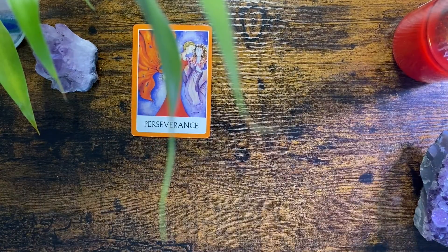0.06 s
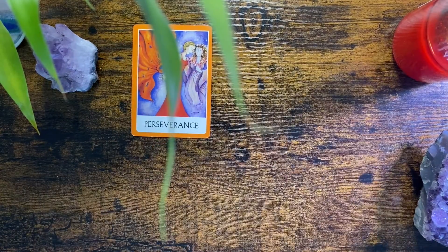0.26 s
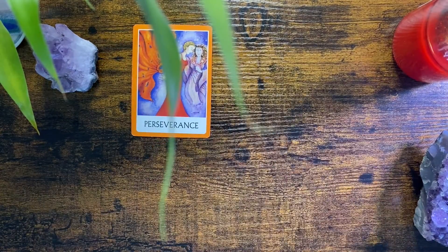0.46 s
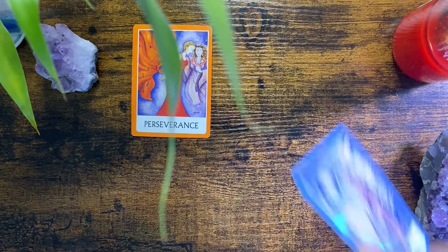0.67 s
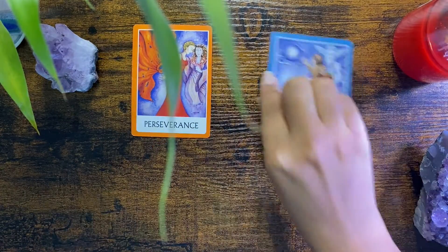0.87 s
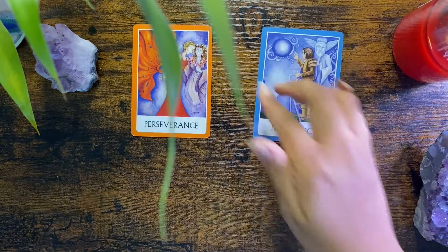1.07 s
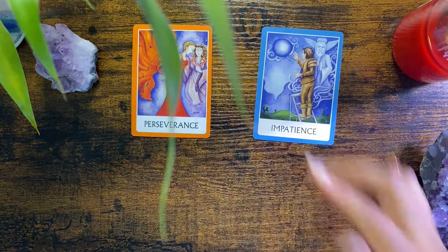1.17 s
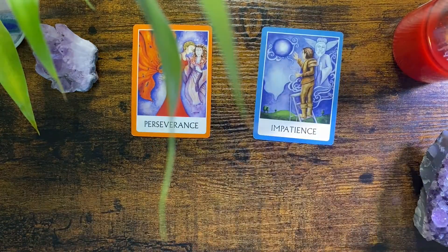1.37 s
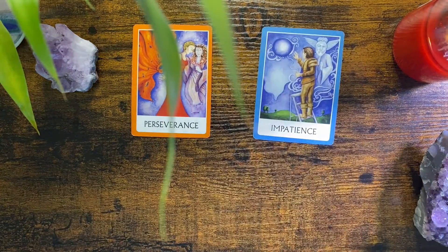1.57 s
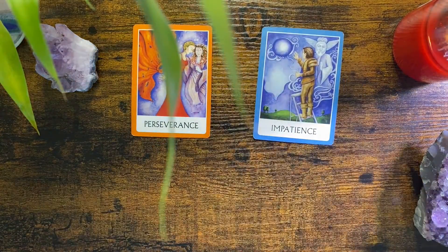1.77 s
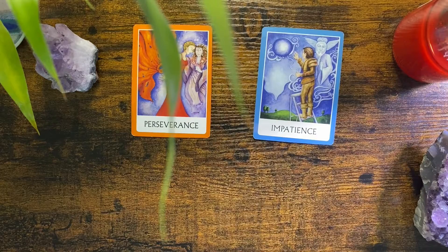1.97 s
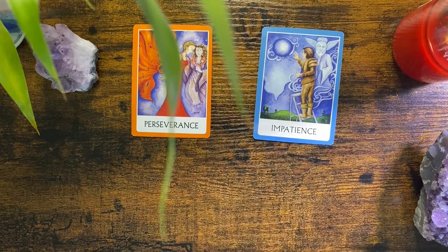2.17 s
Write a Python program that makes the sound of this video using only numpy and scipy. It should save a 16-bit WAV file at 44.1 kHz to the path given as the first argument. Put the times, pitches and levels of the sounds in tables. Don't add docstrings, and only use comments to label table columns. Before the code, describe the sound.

Stiff cards handled on a wooden table: a papery rub, two sharp snaps with air puffs, a ringing knock as one lands, a short pause, then softer knocks and drags; close phone microphone in a quiet room.

```python
import sys
import numpy as np
from scipy import signal
from scipy.fft import rfft, irfft
from scipy.io import wavfile
from scipy.ndimage import uniform_filter1d

SR = 44100
rng = np.random.default_rng(int(sys.argv[2]) if len(sys.argv) > 2 else 0)


def to_wav(sig):
    pcm = np.clip(np.atleast_2d(sig), -1, 1) * 32767
    pcm = np.round(pcm).astype(np.int16)
    wavfile.write(sys.argv[1], SR, pcm.T)


def how_loud(loudness_db):
    steps = np.asarray(loudness_db, float) / 20
    return 10 ** steps


N = 99225

# f/Hz, level/dB (rms)
HUM_LINES = [
    (204.6, -53),
    (306, -61),
]
# f/Hz, level/dB (per Hz)
AIR_COLOUR = [(30, -12.5), (100, 2), (250, 16.5), (500, 10.5), (800, -6.5), (2600, -2), (5000, -19.5),
              (16000, -35)]
# start t/s, end t/s, first level/dB, last level/dB
SLEEVE_BRUSHES = [
    (0, 0.203, -50.5, -65),
    (1.295, 1.406, -50, -44.5),
]
# start t/s, end t/s, first level/dB, last level/dB, treble level/dB
CARD_RUBS = [(0, 0.213, -45, -48.5, 2.5), (0.209, 0.254, -48.5, -36, 3), (0.276, 0.387, -52, -42, 2.5),
             (0.372, 0.425, -36.5, -33.5, 9), (0.424, 0.463, -37, -33.5, 8),
             (0.506, 0.639, -51.5, -43.5, 5), (0.641, 0.692, -42, -43.5, -2),
             (0.723, 0.827, -52, -60.5, 3.5), (0.824, 0.877, -26.5, -43, -4), (0.873, 0.897, -44, -43, -2),
             (0.893, 1.022, -41.5, -50, 9.5), (1.021, 1.1, -32.5, -52.5, 14), (1.024, 1.06, -48, -57, -3),
             (1.104, 1.214, -39, -64, 0), (1.347, 1.419, -78, -63.5, 11.5), (1.43, 1.546, -39.5, -61.5, 6),
             (1.542, 1.616, -44.5, -38.5, -0.5), (1.613, 1.649, -29, -40.5, 0),
             (1.663, 1.73, -54.5, -33.5, -0.5), (1.721, 1.799, -40.5, -29.5, 5.5),
             (1.827, 1.919, -43, -42.5, 6), (1.932, 1.978, -35.5, -34, -1), (1.998, 2.084, -51.5, -62, 3.5),
             (2.08, 2.116, -49.5, -46, -1.5), (2.15, 2.215, -49, -53, -2.5), (2.225, 2.26, -54, -57, 0.5)]
# f/Hz, level/dB (per Hz)
PAPER_COLOUR = [(300, -3.5), (600, -2), (1100, -2), (2600, -2.5), (3800, -9.5), (5500, -20), (9000, -36.5)]
# f/Hz, level/dB (per Hz)
HISS_COLOUR = [(3000, -30), (5500, -11.5), (6900, -12.5), (9500, -13.5), (12000, -24.5), (15500, -27)]
# f/Hz, level/dB, time to fall 60 dB t/s
TABLE_MODES = [(62, 0, .12), (88, 0, .1), (110, -2, .09), (147, -2, .09), (208, 0, .14), (252, -4, .08),
               (312, 0, .09), (360, -1, .08), (441, 0, .085), (520, -2, .05), (620, -3, .04),
               (850, -1, .04), (1050, -3, .03), (1230, -1, .045)]
# start t/s, end t/s, first level/dB, last level/dB, favoured f/Hz
HAND_DRAGS = [(0.328, 0.486, -44.5, -33.5, 117), (0.443, 0.647, -33, -62, 101),
              (0.805, 0.877, -38.5, -37, 120), (0, 0.305, -67, -34, 94), (0.996, 1.236, -28.5, -59.5, 102),
              (1.417, 1.5, -30, -58, 150), (1.55, 1.667, -27, -24.5, 151), (1.685, 1.724, -28, -31.5, 100),
              (1.744, 1.82, -22.5, -32.5, 237), (1.844, 1.905, -49, -34, 200),
              (1.92, 2.018, -28, -31.5, 204), (2.026, 2.111, -44, -34.5, 198), (2.156, 2.26, -33, -44, 172)]
# t/s, level/dB, f/Hz favoured by the spot, share of the free ring time
TABLE_KNOCKS = [(0.261, -25.5, 88, 0.34), (0.331, -33, 89, 0.39), (0.386, -36, 81, 0.26),
                (.454, -16, 463, 0.29), (0.627, -22.5, 832, 0.39), (0.6282, -20.5, 1190, 0.28),
                (0.624, -33, 140, 0.67), (0.734, -28.5, 564, 0.27), (.825, -21.5, 865, 0.4),
                (0.827, -30.5, 87, 0.51), (0.838, -24, 720, 0.22), (0.874, -23, 364, 0.38),
                (0.876, -27, 600, 0.18), (1.0229, -7.5, 436, 1.1), (1.033, -17.5, 445.3, 1.39),
                (1.025, -17, 1225, 0.74), (1.017, -19.5, 94, 0.4), (1.021, -9.5, 1110, 0.2),
                (1.030, -17, 203.5, 1.77), (1.422, -25.5, 145, 0.36), (1.440, -29.5, 426, 0.56),
                (1.549, -12, 295, 1.1), (1.563, -13.5, 201, 1), (1.582, -18, 75, 0.44),
                (1.607, -19.5, 281, 0.57), (1.634, -15, 210, 0.7), (1.642, -13.5, 330, 0.28),
                (1.650, -15, 158, 0.8), (1.671, -24, 302, 0.47), (1.688, -23.5, 79.6, 0.42),
                (1.727, -10.5, 296, 1.3), (1.749, -26, 69, .5), (1.766, -25, 330, .5),
                (1.78, -21.5, 484, 0.7), (1.786, -18, 250, 0.8), (1.796, -22.5, 127, 1.2),
                (1.871, -29, 306, 1.3), (1.906, -23, 213, 1), (1.923, -24, 340, 0.73),
                (1.949, -23, 264, 0.77), (1.972, -24.5, 212, 0.4), (1.988, -27, 112, 0.68),
                (1.998, -23.5, 318, 0.78), (2.088, -29, 303, .6), (2.169, -31, 307, 0.61),
                (2.182, -33, 92, 0.59), (2.239, -35.5, 200, .6)]
# t/s of the extreme, peak level/dB, width t/ms, push +1 or pull -1
AIR_PUFFS = [
    (.2448, -12, 2.5, 1),
    (.2516, 0, 1.05, -1),
    (.2575, -11, 4, 1),
    (.4655, -14, 3, 1),
    (.4698, -5, 1.1, -1),
    (.4735, -12, 2, 1),
    (.4812, -12, 2.2, -1),
    (.4848, -11, 1.0, 1),
]
# t/s, peak level/dB, treble level/dB,
# ring-down t/ms, f/Hz of the flexed card (for the scrape, its pitch)
EDGE_CRACKS = [(0.044, -29, -24, 2.1, 1950), (0.228, -24, -25, 2.6, 2200), (0.233, -14, -34, 1.8, 1274),
               (0.2494, -9, -15.5, 1.2, 1850), (0.249, -14, -14, 2.4, 3300),
               (0.2337, -17.5, -32, 1.7, 3360), (.365, -26, 3, 1.2, 4200), (0.382, -22.5, -17, 1.8, 1390),
               (.444, -18, -18, 5.6, 2610), (.4535, -9, -30, 1.05, 2340), (0.458, -15, -19, 3.3, 1100),
               (0.4657, -11.5, -9, 1.2, 2520), (0.4835, -7.5, -8.5, 1.46, 1930),
               (0.4841, -14, -12, 0.8, 4970), (0.487, -11, -30, 1.72, 1090), (0.627, -12, -6.5, 0.37, 2600),
               (.824, -16.5, -8, 2.7, 3320), (0.832, -32, -14, 1.5, 1820), (.843, -29, -6, 2.4, 3500),
               (.874, -25.5, -20, 2.9, 910), (0.957, -30, -25.5, 25, 3030), (1.004, -21.5, -9, 7.8, 3100),
               (1.020, -5.5, 3.5, 3.4, 3200), (1.032, -37, 12, 1.3, 3540), (1.107, -26, -20, 2.7, 2500),
               (1.4259, -31.5, -18, 1.8, 2730), (1.441, -31.5, -17, 4, 2170),
               (1.550, -31.5, -32, 4.5, 1050), (1.614, -23.5, -11, 5.5, 1490),
               (1.672, -22.5, -8, 4.5, 1470), (1.698, -22, -9, 6.1, 1620), (1.730, -13.5, -6, 4.6, 1340),
               (1.73, -5.5, -21, 1.8, 2200), (2.087, -47.5, 7.5, 3, 2500), (1.948, -27, -3.5, 14, 2550),
               (2.233, -48, -19, 2.1, 2340)]

LOWEST_HZ = 50


def unit_rms(x):
    return x / np.sqrt(np.mean(x ** 2))


def unit_peak(x):
    return x / np.max(np.abs(x))


def colour(x, points):
    hz = np.maximum(np.fft.rfftfreq(len(x), 1 / SR), 1)
    point_hz, point_db = np.array(points, float).T
    gain_db = np.interp(np.log(hz), np.log(point_hz), point_db)
    return irfft(rfft(x) * how_loud(gain_db), len(x))


def band(x, hz, width_hz):
    return signal.lfilter(*signal.iirpeak(hz, hz / width_hz, fs=SR), x)


def butter(x, order, hz, kind):
    return signal.sosfilt(signal.butter(order, hz, kind, fs=SR, output="sos"), x)


def add(out, start_s, x):
    i = max(int(start_s * SR), 0)
    out[i:i + len(x)] += x[:N - i]


def walk(rate):
    hold = int(SR / rate)
    steps = np.repeat(rng.standard_normal(N // hold + 1), hold)
    return 0.89 * uniform_filter1d(uniform_filter1d(steps, hold), hold)[:N]


def stroke(start_s, end_s, first_db, last_db):
    attack_s, release_s = 0.011, 0.014
    t = np.arange(N) / SR
    hold = how_loud(np.interp(t, [start_s, end_s], [first_db, last_db]))
    attack = np.clip((t - start_s) / attack_s + (start_s <= 0), 0, 1)
    return hold * attack * np.exp(-np.maximum(t - end_s, 0) / release_s)


def patchy(x):
    swell_db, swells_per_s = 2, 30
    edges = 350 * 2 ** np.arange(0, 6.1, .5)
    hz, spectrum = np.fft.rfftfreq(len(x), 1 / SR), rfft(x)
    out = 0
    for low, high in zip(np.append(0, edges), edges):
        part = irfft(spectrum * (hz >= low) * (hz < high), len(x))
        out = out + part * how_loud(swell_db * walk(swells_per_s))
    return out


def ring(force, modes, extra_db):
    out = 0
    for (hz, db, t60_s), extra in zip(modes, extra_db):
        pole = np.exp(2j * np.pi * hz / SR - np.log(1000) / (t60_s * SR))
        out = out + how_loud(db + extra) * signal.lfilter([1], [1, -pole], force).imag
    return out


def spot(hz, db_per_oct2):
    return -db_per_oct2 * np.log2(np.array(TABLE_MODES)[:, 0] / hz) ** 2


def hum():
    out = 0
    for hz, db in HUM_LINES:
        level = np.sqrt(2) * how_loud(db + 1.5 * walk(31.0))
        cycles = hz * np.cumsum(1 + 0.0082 * walk(6.9)) / SR
        out = out + level * np.sin(2 * np.pi * cycles)
    return out


def room_air():
    air = colour(rng.standard_normal(N), AIR_COLOUR)
    return air * how_loud(-64) / np.std(butter(air, 4, 600, "high"))


def sleeve():
    centre_hz, width_hz = 485, 110
    edges = [centre_hz - width_hz / 2, centre_hz + width_hz / 2]
    cloth = unit_rms(butter(rng.standard_normal(N), 3, edges, "band"))
    weave = unit_rms(band(rng.standard_normal(N), 2750, 340))
    return (cloth + how_loud(-16.5) * weave) * sum(stroke(*row) for row in SLEEVE_BRUSHES)


def rubbing():
    grains_per_s, grain_db, flicker_db = 3900, 2, 2.5
    hit = rng.random(N) < grains_per_s / SR
    grains = hit * rng.standard_normal(N) * how_loud(grain_db * rng.exponential(size=N))
    grains = patchy(unit_rms(grains) + 2.4 * rng.standard_normal(N))
    paper = colour(grains, PAPER_COLOUR) * how_loud(flicker_db * walk(39.84) + 2.1 * walk(200))
    hiss = colour(grains, HISS_COLOUR) * how_loud(flicker_db * walk(70.24))
    bounce_db, bounce_s = -10, .00027
    hiss = hiss + how_loud(bounce_db) * np.roll(hiss, round(bounce_s * SR))
    paper_level, hiss_level = 0, 0
    for *movement, treble_db in CARD_RUBS:
        level = stroke(*movement)
        paper_level = paper_level + level
        hiss_level = hiss_level + how_loud(treble_db) * level
    return (paper * paper_level + hiss * hiss_level) / np.std(paper + hiss)


def dragging():
    force = rng.standard_normal(N) * how_loud(2.2 * walk(30))
    out = np.zeros(N)
    for start_s, end_s, first_db, last_db, hz in HAND_DRAGS:
        part = slice(int(start_s * SR), int((end_s + .25) * SR))
        gains_db = spot(hz, 4)
        push = (force * stroke(start_s, end_s, first_db, last_db))[part]
        usual = np.std(ring(force[:SR // 4], TABLE_MODES, gains_db))
        out[part] += ring(push, TABLE_MODES, gains_db) / usual
    return butter(out, 4, 480, "low")


def knocks():
    contact_cycles, scatter_db, spot_ring_db, spot_t60_s = 1.1, 1.5, 8, .085
    out, t = np.zeros(N), np.arange(12000) / SR
    scatter = scatter_db * rng.standard_normal((len(TABLE_KNOCKS), len(TABLE_MODES) + 1))
    for (start_s, db, hz, share), uneven_db in zip(TABLE_KNOCKS, scatter):
        push = np.sin(2 * np.pi * np.clip(t * hz / contact_cycles, 0, 1))
        modes = np.array(TABLE_MODES + [(hz, spot_ring_db, spot_t60_s)]) * [1, 1, share]
        gains_db = uneven_db + np.append(spot(hz, 24), 0)
        add(out, start_s, how_loud(db) * unit_peak(ring(-push, modes, gains_db)))
    return out


def puffs():
    even_out_s = .024
    t, air = np.arange(N) / SR, 0
    for peak_s, db, width_ms, sign in AIR_PUFFS:
        air = air + sign * how_loud(db) * np.exp(-np.abs(t - peak_s) * 1000 / width_ms)
    air = uniform_filter1d(air, size=16)
    air = air - uniform_filter1d(air, size=int(even_out_s * SR))
    return signal.sosfiltfilt(signal.butter(2, LOWEST_HZ, "high", fs=SR, output="sos"), air)


def cracks():
    card_q, card_db, click_db = 7.9, -5, -10
    click_hz, click_width_hz, spit_hz, spit_width_hz = 1600, 3100, 7240, 2750
    out, t = np.zeros(N), np.arange(3000) / SR
    noises = rng.standard_normal((len(EDGE_CRACKS), 2, len(t)))
    for (start_s, db, treble_db, fall_ms, hz), noise in zip(EDGE_CRACKS, noises):
        fall = np.exp(-t * 1000 / fall_ms) * np.clip(t / .0008, 0, 1)
        slip, treble = noise * fall
        card = band(slip, hz, hz / card_q)
        click = band(band(slip, click_hz, click_width_hz), click_hz, click_width_hz)
        spit = band(band(treble, spit_hz, spit_width_hz), spit_hz, 2 * spit_width_hz)
        crack = how_loud(card_db) * unit_peak(card) + how_loud(click_db) * unit_peak(click)
        add(out, start_s, how_loud(db) * (crack + how_loud(treble_db) * unit_peak(spit)))
    return out


def room_tail(near):
    t60_s, gap_s = 0.16, 0.00083
    t = np.arange(16000) / SR
    tail = rng.standard_normal(len(t)) * how_loud(-60 * t / t60_s) * (t > gap_s)
    return how_loud(-13) * signal.fftconvolve(near, tail / np.sqrt(np.sum(tail ** 2)))[:N]


def scene():
    near = cracks() + knocks() + rubbing() + dragging()
    sound = near + room_tail(near) + hum() + room_air() + sleeve()
    return (butter(sound, 4, LOWEST_HZ, "high") + puffs())[None]


def band_limit(x):
    return signal.sosfilt(signal.butter(12, 16310, fs=SR, output="sos"), x)


def record(dry):
    ceiling, top_hz = 1.15, 15200
    x = ceiling * np.tanh(dry / ceiling)
    x = signal.sosfilt(signal.ellip(8, .2, 60, top_hz, fs=SR, output="sos"), x)
    return band_limit(x)


dry = scene()
out = record(dry)
to_wav(out)
```